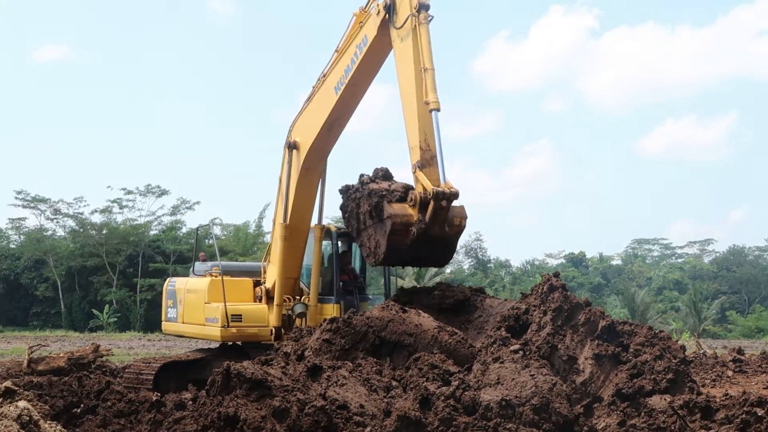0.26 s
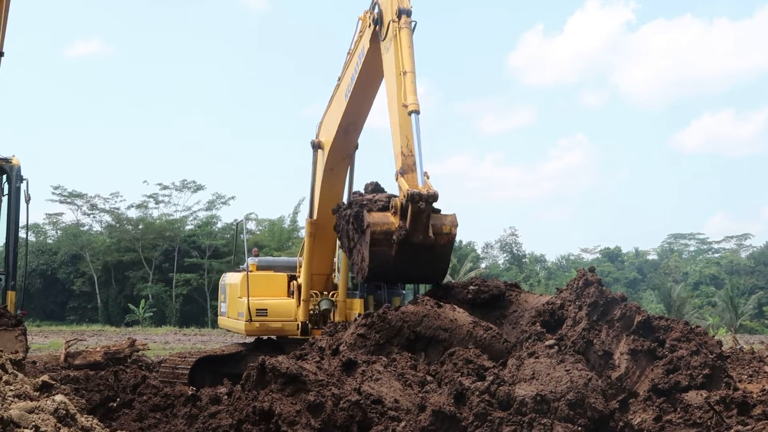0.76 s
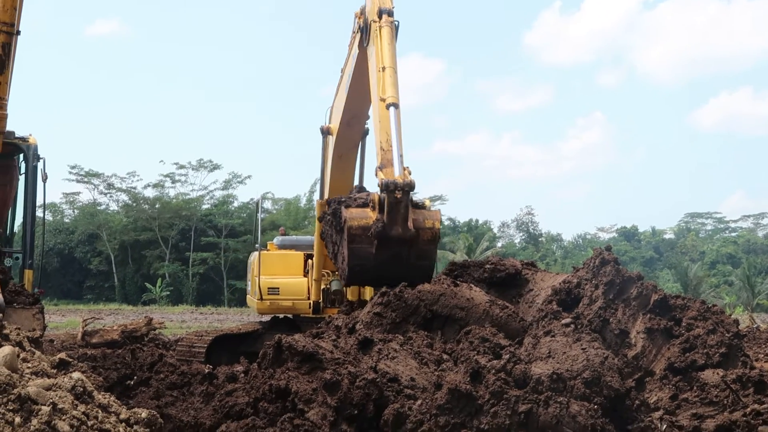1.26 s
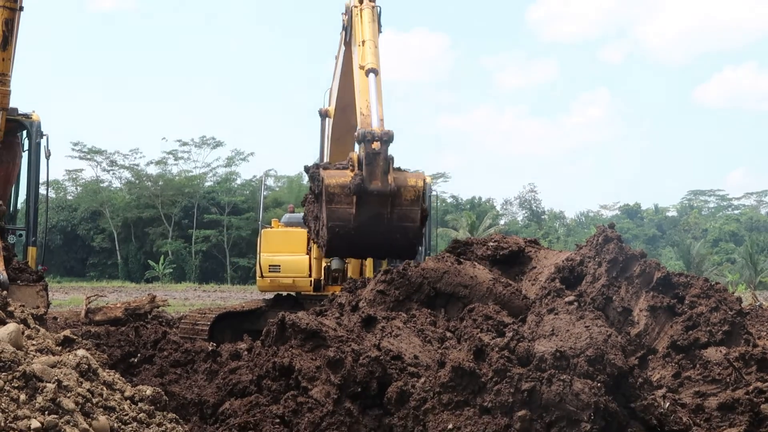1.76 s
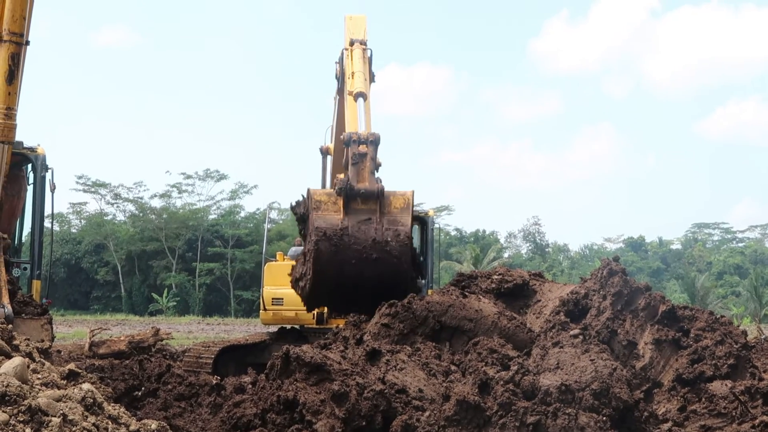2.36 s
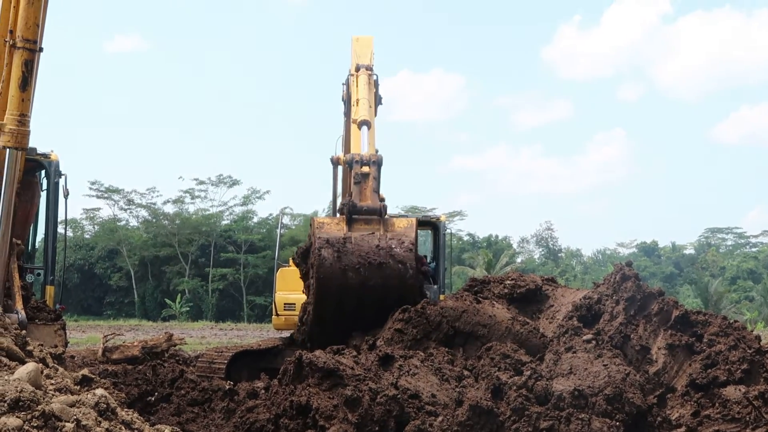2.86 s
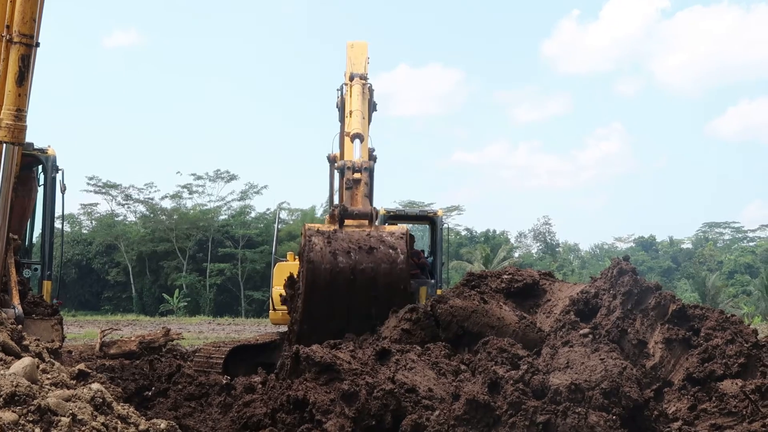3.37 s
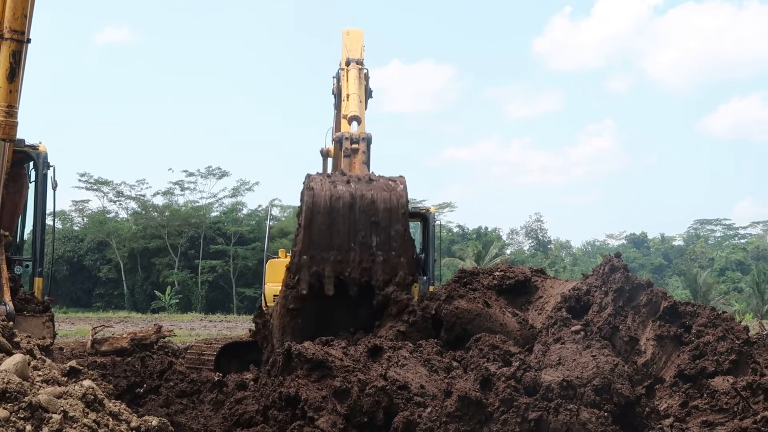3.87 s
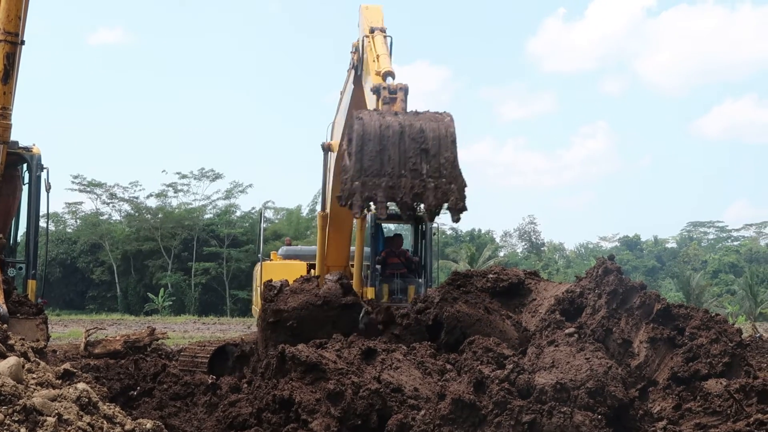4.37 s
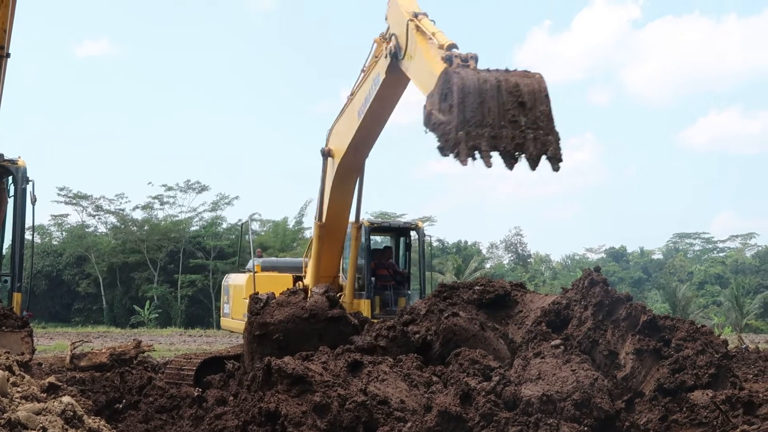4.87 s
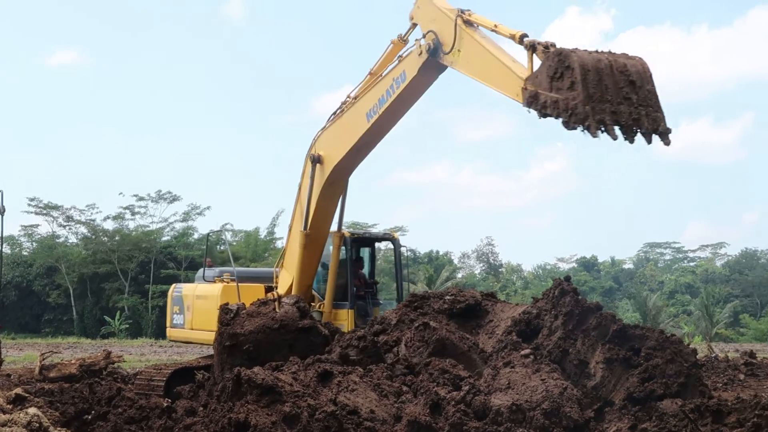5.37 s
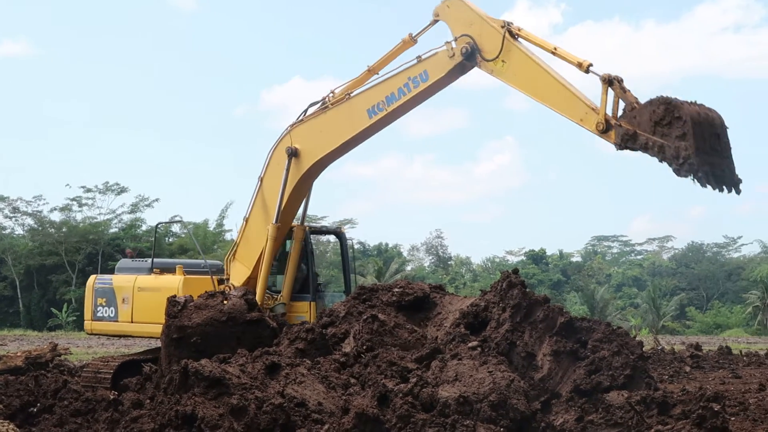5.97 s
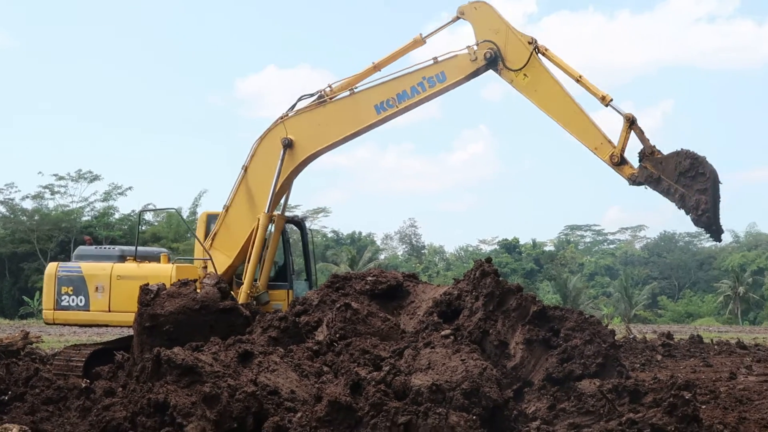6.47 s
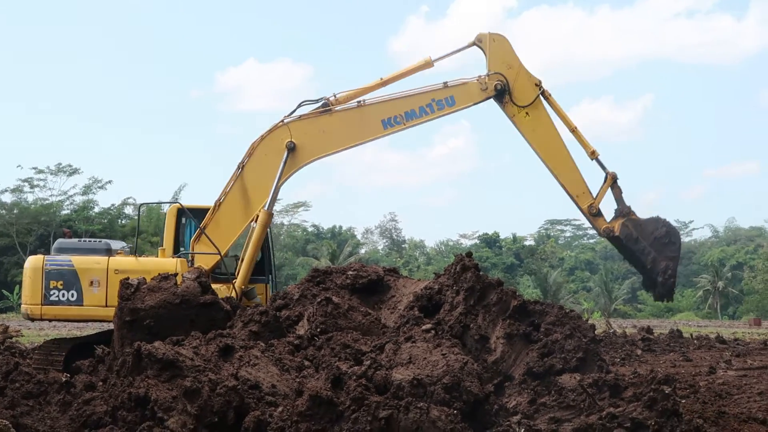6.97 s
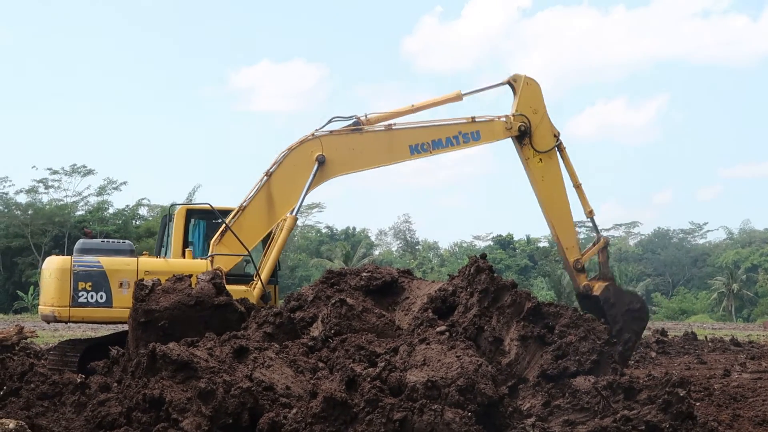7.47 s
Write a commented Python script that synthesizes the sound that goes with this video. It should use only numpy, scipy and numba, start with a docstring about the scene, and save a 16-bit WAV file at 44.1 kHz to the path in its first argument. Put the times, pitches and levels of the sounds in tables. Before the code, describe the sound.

A working excavator heard outdoors from a moderate distance: deep droning engine, dense mechanical clatter, fluttering fan tone and wavering pump whine. Early on, soil rasps on steel and the linkage bangs hard with a short rattle. The engine then sounds more muffled as the machine turns, soil slides midway, and a duller knock follows. Clatter brightens again as its side swings back. Thin falling bird chirps recur, with low bass centred and airy treble spread wide.

```python
"""A hydraulic excavator dumps a bucket of soil and swings back, heard across an open field.
Its six-cylinder diesel is built from tones locked to the firing rate plus coloured noise.
The piston pump whines with more such tones; oil rushes and hisses as filtered noise.
The linkage knocks with dying tones and noise, and soil scrapes as many small noisy cracks.
A second machine hums nearby, a bird chirps falling tones, and a gain control turns loud peaks down."""
import sys
import numpy as np
from scipy import signal
from scipy.fft import rfft, irfft, next_fast_len
from scipy.io import wavfile
from scipy.ndimage import uniform_filter1d
from numba import njit

SR = 44100
rng = np.random.default_rng(int(sys.argv[2]) if len(sys.argv) > 2 else 0)


def wav_out(sig):
    """Save sig, one row per channel (or a flat mono array), as 16-bit PCM at SR to the path in sys.argv[1]."""
    wavfile.write(sys.argv[1], SR, np.round(np.clip(np.atleast_2d(sig).T, -1, 1) * 32767).astype(np.int16))


N = 340893
TIME = np.arange(N) / SR

# Engine speed, sagging under load and overshooting on release: (time [s], firing rate [Hz])
ENGINE_SPEED = [(0, 97.6), (.35, 95.6), (.7, 95.4), (1.1, 93.5), (1.25, 97.7), (1.45, 100), (2.1, 96.66),
                (2.22, 99.74), (2.5, 94.3), (2.7, 93.46), (3.4, 92.16), (3.72, 99.1), (3.95, 100.6),
                (4.12, 94.7), (4.6, 96.14), (5.5, 95.22), (6.55, 95.8), (6.78, 96.63), (7.05, 95.8),
                (7.3, 96.3), (7.5, 100.3), (7.73, 101.1)]
# The house swings round: (time [s], engine flank towards the listener [0-1])
FLANK_VIEW = [(0, 0.94), (.5, 0.78), (1.2, 0.37), (2.5, 0.13), (4.15, 0.2), (4.5, 0.29), (5, 0.39),
              (6, 0.8), (7, 0.96), (7.73, 0.94)]
# Engine noises: (gain at cruise from the front [dB], change per Hz of firing rate [dB],
# extra from the flank [dB])
DRONE_GAIN = (-29.5, 0.067, 6.4)
CLATTER_GAIN = (-35, 0.32, 6.58)
RUMBLE_GAIN = (-25.5, 0.058, 0.8)
CRUISE_HZ = 94.2  # firing rate at which the engine noises have their cruise gain
# Silencer booms near its resonance: (firing rate [Hz], exhaust gain before other changes [dB])
SILENCER_BOOM = [(91.5, -53), (93.8, -30.5), (95, -31.5), (97.5, -21.5), (101, -22.5)]
# Tones locked to the engine: (multiple of the firing rate, relative level [dB])
EXHAUST_TONES = [(1, 2.5), (1.5, -44), (3, -23.5)]
BOOM_TONES = [(0.745, -0.59)]
FAN_TONES = [(3.27, 0.5), (6.54, -21.5)]
PUMP_TONES = [(3, -37), (6, 0), (15, -59), (18, -53)]
PUMP_HARMONICS = [(15, -19), (16.3, -6), (17, -13), (18, -12), (21, -18), (25.5, -14.5), (27, -10.5),
                  (33, -28), (36, -21.5), (39, -22), (115, -30)]
# Exhaust note's octave: (time [s], gain [dB])
OCTAVE_GAIN = [(0, -50), (.5, -52), (.7, -30.5), (2.9, -34), (3.2, -30.5), (5.55, -30.5), (5.85, -64),
               (7.3, -69), (7.55, -29)]
# Fan tones: (time [s], gain [dB])
FAN_GAIN = [(0, -33), (.1, -27), (.2, -40), (.42, -32), (.51, -21), (.58, -25.5), (.68, -22.5), (1.08, -39),
            (1.27, -19.5), (1.5, -23), (1.75, -21.5), (2.38, -23), (2.48, -28.5), (2.75, -27.5),
            (3.43, -31), (3.55, -22), (3.95, -24), (4.12, -26.5), (4.45, -27.5), (4.72, -36.5), (4.96, -28),
            (5.06, -19.5), (5.25, -22.5), (5.42, -31), (5.85, -24.5), (6.04, -36.5), (6.15, -28),
            (6.55, -23.5), (6.78, -23), (6.86, -35), (6.92, -22), (7.28, -23.5), (7.45, -33.5),
            (7.73, -22.5)]
# Low boom swells, while the exhaust note rises or sinks:
# (centre time [s], length [s], boom gain [dB], exhaust change [dB])
BOOM_SWELLS = [(0.186, 0.13, -23, 11), (.27, 0.85, -33, -5.5), (1.805, 0.94, -30.5, -1),
               (2.07, 0.14, -26.5, 1.5), (3.65, 0.18, -25, 1), (3.872, 0.073, -23, 3),
               (5.157, 0.33, -27, -2), (5.698, 1, -40, 2), (6.06, 0.33, -23, -12), (6.5, 0.46, -33, 0),
               (7.68, 0.24, -19, 1)]
BOOM_REST_DB = -45  # gain between swells
FUEL_DB_PER_HZ_S = -0.0032  # the exhaust grows softer while speeding up, louder while coasting
# Noise colours, each used as a relative shape: (frequency [Hz], density [dB per Hz])
DRONE_COLOUR = [(25, -16), (60, -2), (110, 4), (150, -2), (215, -1.5), (280, 3), (400, -2), (470, -5),
                (540, -45), (720, -37), (1200, -75)]
CLATTER_COLOUR = [(300, 1.5), (600, 2), (740, -8), (930, -0.5), (1250, -0.5), (1620, -2.5), (2050, -14.5),
                  (2650, -11), (3250, -18.5), (3800, -20), (5000, -25), (8000, -36.5), (14000, -80)]
BOOM_COLOUR = [(30, -29), (58, -2), (71, 25), (80, 18.5), (90, 31), (102, 16), (135, -58)]
OIL_HISS_COLOUR = [(1500, 10.5), (3000, 3.5), (5000, 1), (7000, -4), (9000, -7.5), (12000, -11),
                   (14500, -15), (16000, -30)]
OIL_RUSH_COLOUR = [(1800, -4), (2300, -4), (2580, 7), (2900, 8), (3250, -23.5), (3750, 0.5), (4400, -8),
                   (8000, -34), (8700, -13), (9500, -43), (10950, -12), (11600, -45), (13500, -34),
                   (15000, -55)]
# strength of the clatter that repeats every engine cycle, against the fresh part
CYCLE_SHARE = .66

# Stretches of pump whine; close rows are one whine that wavers: (start time [s], end time [s],
# gain at start [dB], gain at end [dB], gain at 9 x firing rate [dB], gain at 12 x firing rate [dB])
WHINE_STRETCHES = [(0.16, 0.358, -27.5, -25.5, -42, -57), (0.74, 0.922, -38, -35, -55, -62),
                   (0.973, 1.108, -27.5, -23, -55, -65), (1.17, 1.44, -24.5, -27, -57, -66),
                   (1.496, 1.933, -23.5, -19, -42.5, -44.5), (1.983, 2.158, -29.5, -28, -44, -46),
                   (2.367, 2.42, -30, -26, -41.5, -49), (2.48, 2.518, -26, -25, -43, -50),
                   (2.591, 2.642, -31.5, -25.5, -40, -57), (2.804, 2.98, -33.5, -38.5, -56, -41.5),
                   (3.078, 3.2, -35.5, -33.5, -52, -43.5), (3.33, 3.451, -31, -29, -52, -52),
                   (3.521, 3.57, -31, -29, -52, -52), (3.648, 3.904, -26, -36, -52, -44.5),
                   (3.947, 4.1, -37, -33, -54, -52), (4.18, 4.83, -30.5, -34.5, -52, -54),
                   (5.095, 5.448, -30, -29, -59.5, -53), (5.49, 5.8, -29.5, -44, -49, -55),
                   (6.475, 6.661, -37, -38, -54, -45.5)]
WHINE_ATTACK_S, WHINE_RELEASE_S = 0.079, 0.044
WHINE_REST_DB, OVERTONE_REST_DB = -42.5, -51  # pump gains between stretches
# Oil flow through the valves: (time [s], hiss level before a 6 dB boost [dB])
OIL_FLOW = [(0, -50), (.35, -46.5), (1.2, -43), (2.05, -45.5), (2.54, -55.5), (2.84, -48), (3.22, -49),
            (3.42, -61), (3.8, -56), (4.14, -56.5), (4.36, -54), (5.1, -53), (5.7, -50.5), (7.73, -46.5)]
# Swinging: (time [s], rushing oil level [dB], gain of the high pump harmonics [dB])
SWING_LEVELS = [(0, -38.5, -36), (.5, -45, -48), (1.2, -46, -39.5), (4, -68.5, -63), (4.35, -51.5, -42),
                (5.3, -43, -39.5), (5.9, -44, -42), (7.73, -44, -56)]
# Idling machine's hum: (frequency [Hz], middle level [dB])
IDLE_TONES = [(52, -32.5), (104, -32), (156, -40), (172.5, -36), (905, -53.5)]

# Bird: (start time [s], relative level [dB], middle pitch [Hz])
BIRD_CHIRPS = [(0.293, -38, 4150), (2.308, -41.5, 4000), (2.595, -39, 3960), (2.887, -39, 3882),
               (3.204, -38, 3990), (3.52, -39, 3880), (4.225, -44.5, 3780), (4.575, -41, 3800),
               (4.92, -40, 3850), (5.24, -40, 3880), (5.595, -39, 3944), (5.89, -39, 3935),
               (6.271, -43, 3947), (6.587, -48, 4039), (7.643, -43, 3830)]
CHIRP_S, CHIRP_FALL_HZ = 0.089, 803
# Soil along the bucket: (start time [s], attack [s], time to fall 60 dB [s], grit gain [dB],
# grit tilt [dB per octave], groan gain of the shell [dB])
SOIL_SCRAPES = [(0.335, 0.024, 0.35, -24, -5, -22), (2.79, 0.072, 0.54, -32, -1.5, -26.5),
                (3.241, 0.005, 0.67, -33.5, 1, -50), (3.265, 0.017, 0.66, -44.5, 3.5, -47)]
# Grit before its tilt: (frequency [Hz], density [dB per Hz])
GRIT_COLOUR = [(200, 4), (450, -7), (750, -0.5), (1200, 8.5), (1800, 4), (2300, -5.5), (2900, -0.5),
               (4200, -13.5), (8000, -29), (14000, -58)]
# Groan of the bucket shell: (frequency [Hz], density [dB per Hz])
SHELL_COLOUR = [(150, -22), (280, -1), (400, 5.5), (470, 4), (620, -7.5), (1500, -63)]
STONES_PER_S = 600  # average

# Bucket linkage: (time [s], whole knock gain [dB], thud gain [dB], rattle gain [dB]);
# thud and rattle are within the knock
LINKAGE_KNOCKS = [(0.353, -33, 0, -16), (0.5845, 0.5, 4.5, -14.5), (0.593, -12.5, -10, -8),
                  (0.649, -25, -6, -6), (3.9353, -10, 7.5, -17), (3.954, -24, -6, -10),
                  (3.994, -24, 7, -16), (6.894, -20.5, -9, -33)]
# Ringing arm and bucket: (frequency [Hz], relative level [dB], time to fall 60 dB [s])
STEEL_MODES = [(406, -6.5, 0.066), (1030, -19, 0.025), (1210, -5, 0.039), (1550, -9.5, 0.049),
               (1710, -39, 0.19), (1910, -26, 0.021), (2940, -20, 0.022), (2890, -16, 0.088),
               (3900, -46, 0.049)]
# The blow's crack, then the loose parts' rattle: (frequency [Hz], density [dB per Hz])
CRACK_COLOUR = [(200, 12.5), (500, 9), (800, -4), (1100, 7), (1850, 11), (2400, 6), (3000, -7), (4200, -13),
                (7000, -33)]
RATTLE_COLOUR = [(200, 19.5), (500, 12), (780, 2.5), (1100, 5), (1850, 9.5), (2400, -8), (3000, -5.5),
                 (4200, -3), (8000, -12)]
THUD_FROM_HZ, THUD_TO_HZ, THUD_GLIDE_S, THUD_T60_S = 454, 95, 0.0018, 0.03
# Thin valve squeals: (start time [s], length [s], start pitch [Hz], end pitch [Hz],
# level before a 3 dB boost [dB])
VALVE_SQUEALS = [(0.363, 0.14, 14900, 13900, -56), (2.24, 0.28, 15160, 14560, -58)]

# Ground scatter: (frequency [Hz], side minus mid before the boosts of impacts and song [dB])
SCATTER_WIDTH = [(60, -46), (110, -37), (200, -28.5), (380, -21), (700, -39), (1290, -26), (2380, -20.5),
                 (4400, -7.5), (8120, -3), (15000, 0)]
IMPACT_ECHO_DB = 6.5  # knocks and scrapes scatter more widely than the engine
# A faint hiss in the side signal: (frequency [Hz], density [dB per Hz])
SIDE_HISS_COLOUR = [(700, 3.5), (1500, -5.5), (2700, 1.5), (4800, -3.5), (8500, -8), (12000, -6.5),
                    (15000, -20)]
# That hiss over time: (time [s], level [dB])
SIDE_HISS_LEVEL = [(0, -55), (2.5, -48.5), (3.2, -50), (4, -50.5), (5, -52), (7.73, -47.5)]
TOP_HZ = 15200  # upper edge of the finished sound


def undb(db):
    """Turn decibels into a gain."""
    return 10 ** (np.asarray(db) / 20)


def unit(x):
    """Scale to rms (average strength) 1."""
    return x / np.sqrt(np.mean(x ** 2))


def curves(table):
    """Draw each column of a time table sample by sample."""
    s, *columns = np.transpose(table)
    return [np.interp(TIME, s, c) for c in columns]


def noise():
    """White noise: equally strong at every frequency."""
    return rng.standard_normal(N)


def shape(x, points):
    """Filter by (Hz, dB) points joined on a log-frequency axis."""
    hz, db = np.transpose(points)
    size = next_fast_len(N + 8192)
    f = np.maximum(np.arange(size // 2 + 1) * SR / size, 1)
    gain = undb(np.interp(np.log(f), np.log(hz), db))
    return irfft(rfft(x, size) * gain, size)[:N]


def walk(rate):
    """Smooth chance of rms 1, with rate new values a second; it holds still once 2048 are used."""
    values = rng.standard_normal(2048)
    joined = np.interp(TIME * rate, np.arange(len(values)), values)
    return unit(uniform_filter1d(joined, max(int(SR / rate / 2), 1)))


def tones(turns, orders, flutter_db, wander, rate):
    """Tones locked to a rotation; each flutters in level and phase on its way through the air."""
    total = 0
    for multiple, db in orders:
        gain = undb(db + flutter_db * walk(rate)) * np.sqrt(2)
        total = total + gain * np.sin(2 * np.pi * multiple * turns + wander * walk(rate))
    return total


def decay(t, t60):
    """Die away by 60 dB in t60 seconds."""
    return np.exp(-np.log(1000) * t / t60)


def lowpass(order, hz):
    """Make a filter that keeps what lies below hz."""
    return signal.butter(order, hz, fs=SR, output="sos")


def clatter(turns, depth=0.14, flicker_db=1.14):
    """Injectors and valves: a burst a firing; part of the pattern repeats every six-cylinder cycle."""
    pattern = rng.standard_normal(2700)
    cycle = turns / 6 % 1
    locked = unit(np.interp(cycle * len(pattern), np.arange(len(pattern)), pattern))
    bursts = 1 + depth * np.cos(2 * np.pi * turns)
    coloured = shape((CYCLE_SHARE * locked + noise()) * bursts, CLATTER_COLOUR)
    return unit(coloured) * undb(flicker_db * walk(30))


def engine_level(law, firing_hz, flank):
    """Gain in dB: louder with speed, and as the engine's flank turns into view."""
    db, db_per_hz, flank_db = law
    return db + db_per_hz * (firing_hz - CRUISE_HZ) + flank_db * flank


def swells():
    """Gain of the low boom and change of the exhaust note in dB; each swell is one smooth arch."""
    boom, exhaust_change_db = undb(BOOM_REST_DB), 0
    for s, length, db, change_db in BOOM_SWELLS:
        arch = np.cos(np.pi * np.clip((TIME - s) / length, -.5, .5))
        boom = np.maximum(boom, undb(db) * arch)
        exhaust_change_db = exhaust_change_db + change_db * arch
    return boom, exhaust_change_db


def diesel(turns, firing_hz, split_hz=290):
    """Exhaust pulses make a note and low boom; fan tones, housing drone and clatter join in."""
    (flank,), (octave_db,), (fan_db,) = curves(FLANK_VIEW), curves(OCTAVE_GAIN), curves(FAN_GAIN)
    boom_gain, exhaust_change_db = swells()
    pickup = uniform_filter1d(np.gradient(firing_hz) * SR, size=SR // 6)  # Hz per second
    silencer_db = np.interp(firing_hz, *np.transpose(SILENCER_BOOM))
    exhaust_db = silencer_db + FUEL_DB_PER_HZ_S * pickup + exhaust_change_db
    exhaust = tones(turns, EXHAUST_TONES, flutter_db=1.0, wander=0.2, rate=16) * undb(exhaust_db)
    octave = tones(turns, [(2, 0.021)], flutter_db=0.5, wander=0.14, rate=7) * undb(octave_db)
    fan = tones(turns, FAN_TONES, flutter_db=2.07, wander=0.17, rate=20) * undb(fan_db)
    boom_tone = tones(turns, BOOM_TONES, flutter_db=1.0, wander=0.84, rate=12)
    boom_noise = undb(2.5) * unit(shape(noise(), BOOM_COLOUR))
    boom = (boom_tone + boom_noise) * boom_gain
    puffs = 1 + 0.11 * np.cos(2 * np.pi * turns)
    housing = unit(shape(noise() * puffs, DRONE_COLOUR)) * undb(.8 * walk(12))
    # the housing's lowest rumble bends round the machine; the drone above is beamed from the flank
    rumble = signal.sosfiltfilt(lowpass(3, split_hz), housing)
    drone = housing - rumble
    parts = [(rumble, RUMBLE_GAIN), (drone, DRONE_GAIN), (clatter(turns), CLATTER_GAIN)]
    noises = sum(part * undb(engine_level(law, firing_hz, flank)) for part, law in parts)
    return exhaust + octave + fan + boom + noises


def whine_gains():
    """Gains of the whine and two overtones: each stretch fades in, drifts and fades out."""
    whine = undb(WHINE_REST_DB)
    ninth = twelfth = undb(OVERTONE_REST_DB)
    for start, end, start_db, end_db, ninth_db, twelfth_db in WHINE_STRETCHES:
        corners = [start - WHINE_ATTACK_S, start, end, end + WHINE_RELEASE_S]
        gate = np.interp(TIME, corners, [0, 1, 1, 0])
        whine = np.maximum(whine, gate * undb(np.interp(TIME, [start, end], [start_db, end_db])))
        ninth = np.maximum(ninth, gate * undb(ninth_db))
        twelfth = np.maximum(twelfth, gate * undb(twelfth_db))
    return whine, ninth, twelfth


def oil_hiss(hiss_db, bright_db=-50, treble_slope=1.0, split_hz=8500):
    """Oil hisses as filtered noise with a slowly changing level; it sounds duller when quiet."""
    hiss = unit(shape(noise(), OIL_HISS_COLOUR))
    low = signal.sosfiltfilt(lowpass(3, min(split_hz, SR / 3)), hiss)
    below_db = np.minimum(hiss_db - bright_db, 0)
    top = (hiss - low) * undb(treble_slope * below_db + 0.49 * walk(18))
    return (low + top) * undb(hiss_db + 6.0 + 0.9 * walk(25))


def hydraulics(turns):
    """Nine pistons whine at multiples of three times the firing rate; oil rushes and hisses."""
    (hiss_db,), (rush_db, harmonics_db) = curves(OIL_FLOW), curves(SWING_LEVELS)
    whine_gain, ninth, twelfth = whine_gains()
    whine = tones(turns, PUMP_TONES, flutter_db=1.86, wander=0.33, rate=20) * whine_gain
    overtones = 0
    for multiple, gain in [(9, ninth), (12, twelfth)]:
        tone = tones(turns, [(multiple, 0)], flutter_db=2.8, wander=1.1, rate=30)
        overtones = overtones + tone * gain
    rush = unit(shape(noise(), OIL_RUSH_COLOUR)) * undb(rush_db)
    # high pump harmonics, locked to the engine
    harmonics = tones(turns, PUMP_HARMONICS, flutter_db=3.0, wander=0.43, rate=14) * undb(harmonics_db)
    return whine + overtones + rush + harmonics + oil_hiss(hiss_db)


def idler():
    """The idling machine hums unevenly; its second harmonic throbs against the working engine."""
    seconds = TIME + 0.0005 * walk(8)  # uneven running
    hum = 0
    for hz, db in IDLE_TONES:
        gain = undb(db + 1.9 * walk(8.3)) * np.sqrt(2)
        hum = hum + gain * np.sin(2 * np.pi * hz * seconds)
    return hum


def glide(s, length, from_hz, to_hz):
    """One gliding whistle with soft ends."""
    out, start = np.zeros(N), int(s * SR)
    u = np.arange(min(int(length * SR), N - start)) / (length * SR)  # 0 to 1 through the whistle
    hz = from_hz + (to_hz - from_hz) * u
    out[start:start + len(u)] = np.sin(np.pi * u) * np.sin(2 * np.pi * np.cumsum(hz) / SR)
    return out


def bird(echo_t60=0.83, wet=0.78, song_db=-3):
    """A far bird repeats a falling chirp at varied pitch; foliage roughens and scatters it."""
    song = 0
    for s, db, hz in BIRD_CHIRPS:
        chirp = glide(s, CHIRP_S, hz + CHIRP_FALL_HZ / 2, hz - CHIRP_FALL_HZ / 2)
        song = song + undb(db + song_db) * chirp
    # this fast walk holds still after about 4.3 s, so later chirps are smooth
    broken = song * (.35 + .85 * walk(480))
    t = TIME[:SR // 2]
    trees = rng.standard_normal(len(t)) * decay(t, echo_t60)
    return broken + wet * signal.fftconvolve(broken, trees / np.linalg.norm(trees))[:N]


def soil(crack_t60=0.026):
    """Clods and stones catch and slip on steel in little dying cracks; the bucket shell groans."""
    catches = (rng.random(N) < STONES_PER_S / SR) * undb(3 * noise())
    cracks = unit(signal.fftconvolve(catches, decay(TIME[:SR // 20], crack_t60))[:N])
    grains = noise() * (.5 + cracks)
    groan = unit(shape(grains, SHELL_COLOUR))
    out = 0
    for s, attack_s, t60, grit_db, tilt_db, groan_db in SOIL_SCRAPES:
        tilted = [(hz, db + tilt_db * np.log2(hz)) for hz, db in GRIT_COLOUR]
        grit = unit(shape(grains, tilted))
        rise = np.clip((TIME - s) / attack_s, 0, 1)
        slide = rise * decay(np.maximum(TIME - s - attack_s, 0), t60)
        out = out + (undb(grit_db) * grit + undb(groan_db) * groan) * slide
    return out


def linkage(rattle_t60=0.5, crunch_t60=0.052, crunch_db=2, crack_t60=0.011, crack_db=-2,
            ring_db=-5, contact_hz=3700):
    """Slack pins slam home: a crack, a bending wave's thud (highs first), ringing steel, rattle."""
    out = np.zeros(N)
    rattle = unit(shape(noise() * undb(4 * walk(260)), RATTLE_COLOUR))
    burst = unit(shape(noise(), CRACK_COLOUR))
    for s, db, thud_db, rattle_db in LINKAGE_KNOCKS:
        start = int(s * SR)
        t = TIME[:min(SR // 2, N - start)]
        span = slice(start, start + len(t))
        thud_hz = THUD_TO_HZ + (THUD_FROM_HZ - THUD_TO_HZ) * np.exp(-t / THUD_GLIDE_S)
        thud_wave = np.sin(2 * np.pi * np.cumsum(thud_hz) / SR)
        thud = undb(thud_db) * decay(t, THUD_T60_S) * thud_wave
        ring = 0
        for hz, mode_db, t60 in STEEL_MODES:
            ring = ring + undb(mode_db + ring_db) * decay(t, t60) * np.sin(2 * np.pi * hz * t)
        crack = undb(crack_db) * decay(t, crack_t60) * burst[span]
        tail = (decay(t, rattle_t60) + undb(crunch_db) * decay(t, crunch_t60)) * rattle[span]
        out[span] += undb(db) * (crack + undb(rattle_db) * tail - ring - thud)
    # grease and packed soil soften the contact
    return signal.sosfilt(lowpass(8, contact_hz), out)


def squeals():
    """A valve spool squeals thinly and roughly as it closes."""
    rough = unit(uniform_filter1d(noise(), size=90))
    return rough * sum(undb(db + 3) * glide(s, length, a, b) for s, length, a, b, db in VALVE_SQUEALS)


def scene():
    """Everything lies ahead: the bass is nearly alike in both ears, the treble diffuse."""
    (firing_hz,), (wide_db,) = curves(ENGINE_SPEED), curves(SIDE_HISS_LEVEL)
    turns = np.cumsum(firing_hz) / SR  # firings so far
    machines = diesel(turns, firing_hz) + hydraulics(turns) + idler() + squeals()
    song = bird()
    impacts = soil() + linkage()
    mid = machines + impacts + song
    # rough ground scatters the sound sideways
    t = TIME[:SR // 4]
    ground = rng.standard_normal(len(t)) * decay(t, t60=.2)
    sent = machines + undb(IMPACT_ECHO_DB) * impacts + undb(5) * song
    scattered = signal.fftconvolve(sent, ground / np.linalg.norm(ground))[:N]
    side_hiss = unit(shape(noise(), SIDE_HISS_COLOUR)) * undb(wide_db)
    side = shape(scattered, SCATTER_WIDTH) + side_hiss
    return np.array([mid + side, mid - side])


@njit
def follower(x, attack, release):
    """Follow the peaks with a quick rise and a slow fall."""
    out, e = np.empty(len(x)), 0.
    for i in range(len(x)):
        e += (x[i] - e) * (attack if x[i] > e else release)
        out[i] = e
    return out


def record(dry, ceiling_db=-7.0, attack_s=0.00095, release_s=1.0, lag_s=0.0042):
    """Gain control acts just too late for a knock, which saturates; it then recovers slowly."""
    peak = follower(np.abs(dry).max(axis=0), 1 / (attack_s * SR), 1 / (release_s * SR))
    late_peak = np.interp(TIME - lag_s, TIME, peak)
    held = dry * np.minimum(1, undb(ceiling_db) / (late_peak + 1e-9))
    rounded = held / (1 + held ** 4) ** .25  # soft saturation
    low_cut = signal.sosfilt(signal.butter(3, 33, "high", fs=SR, output="sos"), rounded)
    return signal.sosfilt(signal.ellip(8, .2, 70, TOP_HZ, fs=SR, output="sos"), low_cut)


dry = scene()
out = record(dry)
wav_out(out)
```